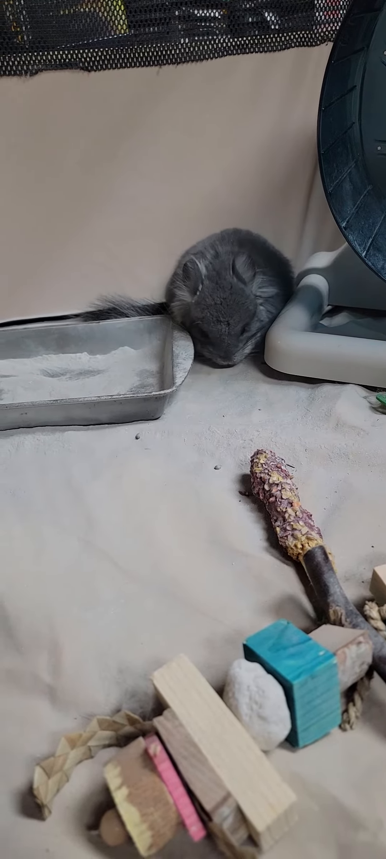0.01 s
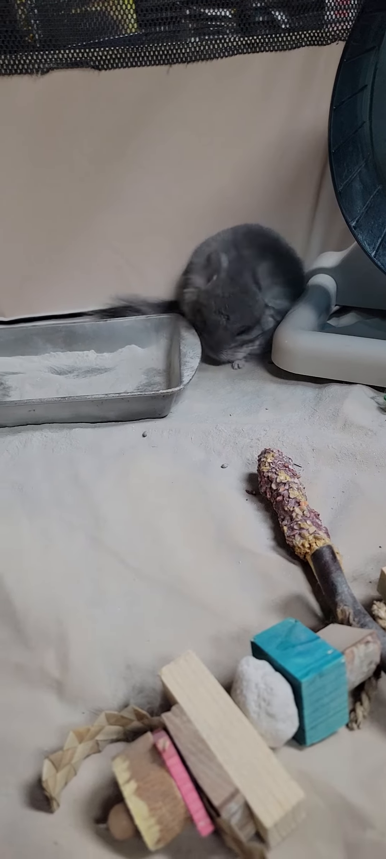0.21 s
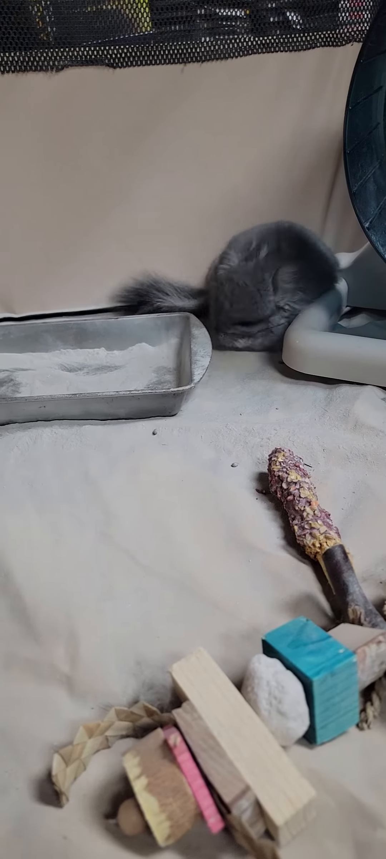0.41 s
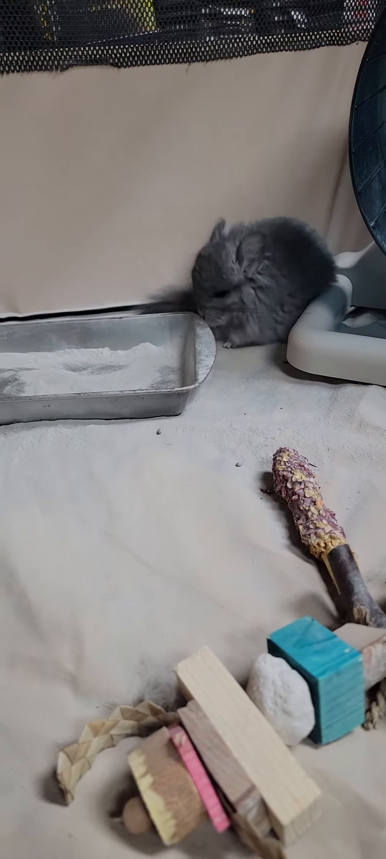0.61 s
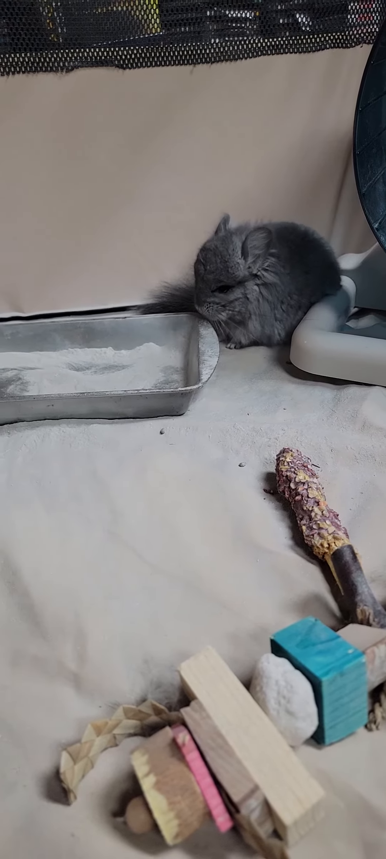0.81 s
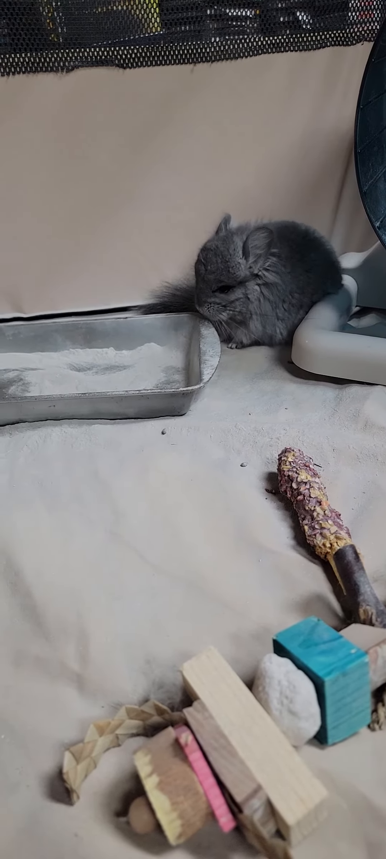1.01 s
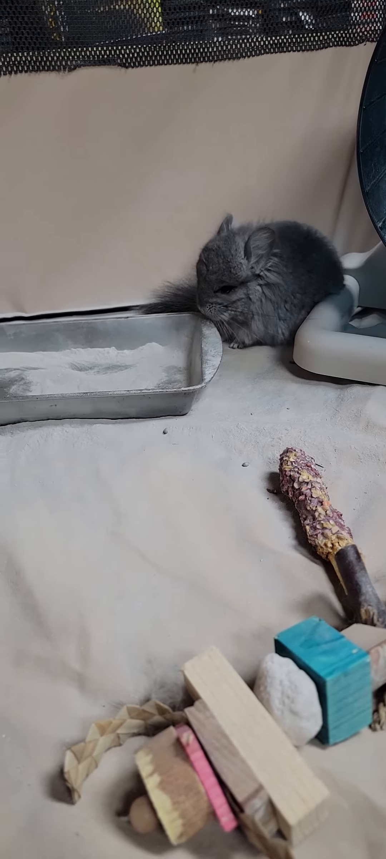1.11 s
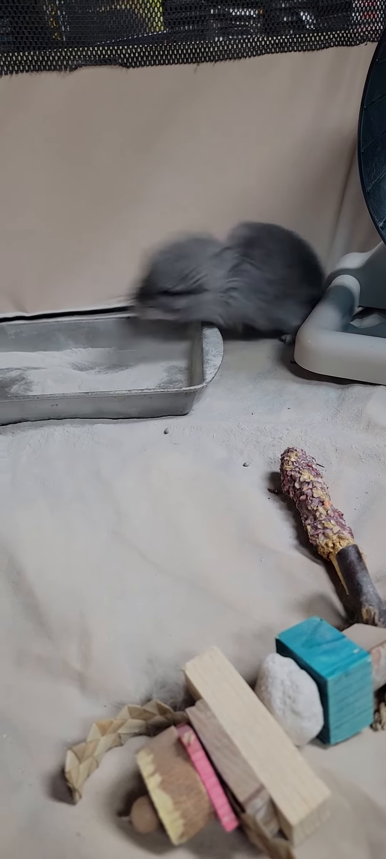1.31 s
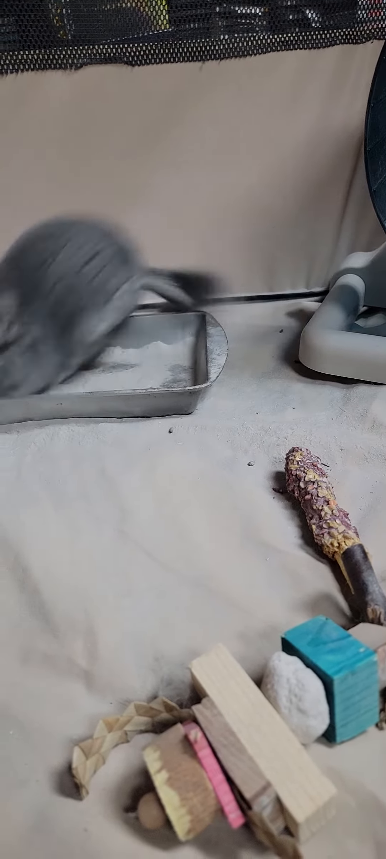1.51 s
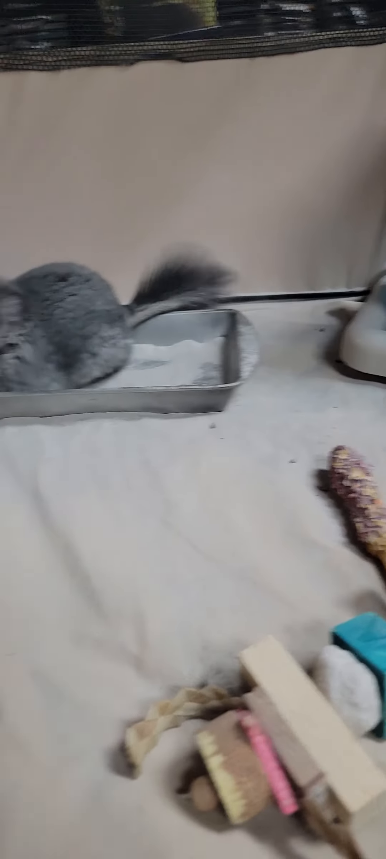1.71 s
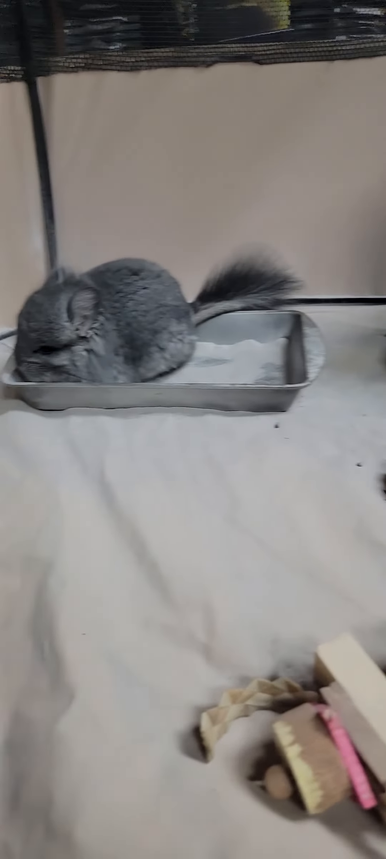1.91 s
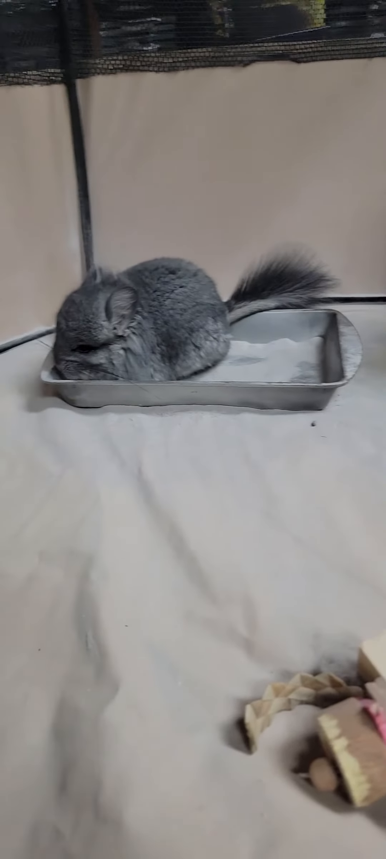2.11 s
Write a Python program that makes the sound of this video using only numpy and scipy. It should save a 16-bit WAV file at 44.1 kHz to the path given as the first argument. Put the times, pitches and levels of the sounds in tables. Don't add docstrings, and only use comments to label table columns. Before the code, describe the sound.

Small rodent's claws scratch taut cloth in a quick burst, then it lands in a metal tray

```python
import sys
import numpy as np
from scipy import signal
from scipy.fft import rfft, irfft
from scipy.io import wavfile
from scipy.ndimage import uniform_filter1d

SR = 44100
rng = np.random.default_rng(int(sys.argv[2]) if len(sys.argv) > 2 else 0)


def bounce(signal):
    frames = np.transpose(np.atleast_2d(signal))
    limited = np.clip(frames, -1, 1)
    pcm = np.round(limited * 32767).astype(np.int16)
    wavfile.write(sys.argv[1], SR, pcm)


def invert_db(x):
    u = np.asarray(x, float) / 20
    return 10 ** u


N = 97020
SLIPS_PER_S, GRAINS_PER_S = 5000, 16000
SPAN_DB = 25.5


def scratching():
    # peak_s, rise_s, fall_s, level_db, hiss_db
    strokes = [(.149, 0.0048, 0.043, -60.5, -24), (.186, 0.017, 0.079, -53, -4.5),
               (.242, 0.037, 0.032, -36.5, 1), (.253, 0.012, 0.011, -46, -2),
               (.296, 0.0047, 0.031, -48.5, -7), (.335, 0.037, 0.036, -39.5, -9.5),
               (.353, 0.026, 0.046, -41, -1.5), (.424, 0.011, 0.018, -43.5, -8),
               (.445, 0.13, 0.08, -51.5, 0.5), (.485, 0.049, 0.027, -51, -1.5),
               (.527, 0.021, 0.026, -51, 1), (.59, 0.0058, 0.0067, -54.5, -20),
               (.612, 0.016, 0.017, -61, -3), (.632, 0.011, 0.0068, -59.5, 8.5),
               (.66, 0.02, 0.03, -64.5, -1), (.676, 0.0094, 0.018, -57, -13)]
    # peak_s, rise_s, fall_s, level_db, hiss_db
    cracks = [
        (1.396, 0.0007, 0.015, -41, 2.5),
        (1.399, 0.0031, 0.042, -45.5, -13),
    ]
    drive = slips(SLIPS_PER_S, spread_db=1.0, clump_db=1.0)
    return rubbing([*strokes, *cracks], cloth, drive, fold_db=3.5)


def snagging():
    # start_s, level_db, pitch_khz
    catches = [(.2285, -31.5, 2.7), (.2345, -39.5, 1.28), (.2395, -34, 2.6), (.243, -28, 2.4),
               (.2478, -31, 3.4), (.2513, -28, 2.56), (.2538, -28.5, 2.3), (.2955, -43, 2.1),
               (.327, -34, 2.3), (.332, -37, 1.96), (.338, -33, 2.1), (.3465, -33.5, 1.93),
               (.3505, -33, 2.98), (.3555, -42, 2.8), (.372, -43, 1.94), (.399, -43, 2.3),
               (.4235, -35, 2.4), (.4345, -48, 5.5), (.461, -44, 2.9), (.482, -53, 1.77), (.526, -59, 2.6),
               (.590, -47.5, 1.9), (.631, -51.5, 2.24), (.675, -48, 2.3), (.721, -52, 0.63),
               (.743, -67, 2.4), (.785, -61, 2.4), (1.2352, -47.5, 1.25), (1.236, -58, 2.24),
               (1.251, -50.5, 1.15), (1.309, -63, 1.3), (1.321, -60, 1.4), (1.361, -56, 1.1),
               (1.3835, -51, 1.25), (1.5065, -33, 3.6), (1.549, -40, 4.6), (1.558, -32, 2.5),
               (1.572, -32, 2.67)]
    # mode_hz (at pitch 1), level_db, t60_s
    weave_modes = [(1037, -2.5, 0.016), (1317, -8.5, 0.011), (822, -11, 0.0033)]
    return blows(catches, weave_modes, soft_s=0.00027)


def rim_ticks():
    # start_s, level_db
    ticks = [
        (1.3962, -25.5),
        (1.4195, -53.5),
    ]
    # mode_hz, level_db, t60_s
    rim_modes = [(886, -9.5, 0.02), (1864, -1, 0.024), (1970, -10, 0.02), (2140, -7.5, 0.037),
                 (2565, 3, 0.026), (2880, -7, 0.04), (2950, -9, 0.035), (3340, -1.5, 0.028),
                 (3750, -9.5, 0.055), (4200, -35, 0.024), (7100, -11, .025)]
    return blows(ticks, rim_modes, soft_s=0.00016)


def paw_blows():
    # start_s, level_db, pitch_factor
    thumps = [
        (1.510, -47, 1.14),
        (1.5145, -26.5, 1.027),
        (1.5275, -31.5, 0.763),
        (1.8, -69, 0.5),
    ]
    # start_s, level_db, pitch_factor
    taps = [(.316, -42, 0.698), (.345, -50.5, 0.21), (.356, -43.5, 0.84), (.424, -42, 1.11),
            (.677, -50, 0.91), (.678, -51.5, 0.304), (1.248, -63, .6), (.51, -49, 0.645), (1.397, -40, 1.1),
            (1.32, -57, 1.56), (2.185, -54.5, 0.59)]
    # mode_hz, level_db, t60_s
    tray_modes = [(304, -12.5, 0.069), (563, -13.5, 0.081), (749, -8.5, 0.11), (802, -1.5, 0.036),
                  (956, 4, 0.022), (1108, -8.5, 0.081), (1840, -7.5, 0.013), (4000, -39, 0.014)]
    return blows(thumps, tray_modes, soft_s=0.0016) + blows(taps, tray_modes, soft_s=0.0015)


def first_contacts():
    # start_s, level_db, pitch_factor
    knocks = [
        (1.396, -33, 1.87),
        (1.5077, -28.5, 1.017),
        (1.5285, -43, 0.45),
    ]
    # mode_hz, level_db, t60_s
    knock_modes = [(811, 0, 0.036), (920, 9.5, 0.011)]
    return blows(knocks, knock_modes, soft_s=0.00041)[0]


def skidding():
    # peak_s, rise_s, fall_s, level_db, hiss_db
    skids = [
        (1.508, 0.0064, 0.062, -41, -3),
        (1.555, 0.035, 0.027, -42.5, 6.5),
        (1.574, 0.0057, 0.015, -47, 8.5),
        (1.592, 0.1, 0.028, -40, -1),
    ]
    drive = slips(GRAINS_PER_S, spread_db=1.8, clump_db=-1.0)
    return rubbing(skids, dust, drive, fold_db=2.5)


def shuffling():
    # peak_s, rise_s, fall_s, level_db
    shuffles = [(0.044, 0.013, 0.036, -63.5), (.56, 0.55, 0.3, -63.5), (.705, 0.11, 0.069, -59),
                (0.745, 0.014, 0.061, -59.5), (0.784, 0.0092, 0.15, -60.5), (0.862, 0.0077, .05, -68.5),
                (1.24, 0.029, 0.028, -63), (1.255, .02, 0.017, -64), (1.289, 0.096, 0.074, -67.5),
                (1.318, 0.039, 0.093, -62), (1.36, 0.0088, 0.14, -61), (1.644, 0.04, 0.013, -63.5),
                (1.689, 0.0082, 0.017, -66.5), (2.2, 0.084, .05, -67.5)]
    # freq_hz, level_db (per Hz)
    fur_colour = [(250, -61), (500, 3.5), (1300, -4), (2300, -5.5), (4800, -7.5), (7500, -12.5),
                  (9800, -28), (14000, -13)]
    fur = evened(coloured(slips(SLIPS_PER_S, spread_db=2.5, clump_db=1.75), fur_colour))
    return fur * sum(swell(*row) for row in shuffles)


def pressing():
    # peak_s, rise_s, fall_s, level_db
    presses = [(.2, 0.042, .05, -69.5), (.32, 0.043, 0.04, -58), (.44, 0.09, .08, -60.5),
               (.52, 0.063, 0.15, -62.5), (.59, .02, 0.043, -62.5), (.68, 0.036, 0.11, -63.5),
               (1.25, 0.057, 0.065, -62.5), (1.64, 0.055, 0.11, -63)]
    # freq_hz, level_db (per Hz)
    padding_colour = [(70, -30), (130, -1), (300, -3.5), (650, -7), (1300, -37)]
    padding = evened(coloured(slips(SLIPS_PER_S, spread_db=2.5, clump_db=3.0), padding_colour))
    return padding * sum(swell(*row) for row in presses)


def rubbing(rows, body, drive, fold_db):
    # freq_hz, level_db (per Hz)
    hiss_colour = [(1760, -47.5), (3000, -1), (5220, -9.5), (7100, -10), (7890, -13.5), (11600, -19),
                   (12500, -11), (16000, -9)]
    fibres = evened(drive) + 0.8 * evened(slips(GRAINS_PER_S, spread_db=1.5, clump_db=1.0))
    low = evened(folds(body(drive), fold_db))
    high = evened(folds(coloured(fibres, hiss_colour), fold_db))
    return sum(swell(peak, rise, fall, db) * (low + invert_db(hiss_db) * high)
               for peak, rise, fall, db, hiss_db in rows)


def slips(per_s, spread_db, clump_db):
    size = invert_db(spread_db * np.minimum(rng.exponential(1, (2, N)), 4))
    happens = rng.random((2, N)) < per_s / SR
    sign = rng.choice([-1., 1.], (2, N))
    clump = evened(uniform_filter1d(rng.standard_normal(N), size=130))
    return size * happens * sign * invert_db(clump_db * clump)


def cloth(x):
    # freq_hz, width_hz, level_db
    resonances = [(580, 260, -11.5), (1250, 360, -6.5), (1797, 88, 1), (2243, 173, 0.5), (2573, 220, 0.5),
                  (2770, 240, 1), (3380, 570, -7), (4190, 870, -6.5)]
    hz = np.fft.rfftfreq(N, 1 / SR)
    shape = 0
    for k, (f, width, db) in enumerate(resonances):
        shape = shape + invert_db(db) / (1 + 1j * (hz - f) / (width / 2)) * (-1) ** k
    low_cut = hz ** 2 / (hz ** 2 + 450. ** 2)
    return irfft(rfft(x) * shape * low_cut, N)


def dust(x):
    # freq_hz, level_db (per Hz)
    dust_colour = [(150, -9), (350, -11), (700, 15.5), (1400, 7.5), (2600, 4.5), (3600, -15), (5000, -4.5),
                   (8000, -28)]
    return coloured(x, dust_colour)


def folds(x, fold_db):
    z = signal.stft(x, nperseg=256)[2]
    patch = uniform_filter1d(rng.standard_normal(z.shape[1:]), size=3, axis=0)
    patch = evened(uniform_filter1d(patch, size=7, axis=1))
    return signal.istft(z * invert_db(fold_db * patch), nperseg=256)[1][:, :N]


def blows(rows, modes, soft_s):
    t, out = np.arange(4000) / SR, np.zeros((2, N + 4000))
    hz, db, t60 = np.transpose(modes)[:, :, None]
    turns = np.round(rng.random((len(rows), 2, len(modes), 1))) * [[[0]], [[.5]]]
    for (start, level_db, *pitch), turn in zip(rows, turns):
        f = hz * (pitch[0] if pitch else 1)
        partials = invert_db(db - 60 * t / t60) * np.sin(2 * np.pi * (f * t + turn))
        ring = partials.sum(1) * (1 - np.exp(-t / soft_s))
        out[:, round(start * SR):][:, :len(t)] += invert_db(level_db) * ring / abs(ring[0]).max()
    return out[:, :N]


def swell(peak, rise, fall, db):
    t = np.arange(N) / SR - peak
    return invert_db(db - SPAN_DB * np.where(t < 0, (abs(t) / rise) ** 1.65, abs(t) / fall))


def evened(x):
    return x / np.sqrt(np.mean(x ** 2) + 1e-20)


def read(points, hz):
    f, value = np.transpose(points)
    return np.interp(np.log(hz + 1), np.log(f + 1), value)


def coloured(x, points):
    return irfft(rfft(x) * invert_db(read(points, np.fft.rfftfreq(N, 1 / SR))), N)


def pen(x):
    t = np.arange(SR // 2) / SR
    taps = rng.standard_normal((4, len(t))) * (t > .002)
    near = taps[:2] * invert_db(-60 * t / .06)
    far = taps[2:] * invert_db(-60 * t / .3)
    near, far = (v / np.linalg.norm(v, axis=1)[:, None] for v in (near, far))
    return x + signal.fftconvolve(x, invert_db(-10) * near + invert_db(-24) * far, axes=1)[:, :N]


def ports(pair, same):
    # freq_hz, right_lead_rad
    port_turn = [(60, -.28), (200, -.35), (350, -1.0), (520, -1.9), (860, -2.8), (1100, -2.5), (1900, -.8),
                 (4100, -2.8), (5600, -3.5), (9400, -5.0), (14800, -9.2)]
    # freq_hz, left_over_right_db
    port_tilt = [(60, -2), (350, -7.5), (520, 2), (860, 1.5), (1700, 3.5), (3500, -3), (6000, 2.5),
                 (13000, -0.5)]
    hz, (a, b) = np.fft.rfftfreq(N, 1 / SR), rfft(pair)
    likeness = np.clip(read(same, hz), 0, 1)
    tilt = invert_db(read(port_tilt, hz) / 2)
    right = likeness * a + np.sqrt(1 - likeness ** 2) * b
    right = right * np.exp(1j * read(port_turn, hz))
    return irfft(np.array([a * tilt, right / tilt]), N)


def booms():
    # peak_s, rise_s, fall_s, level_db, pitch_hz
    boards = [(0.0558, 0.57, 0.2, -46.5, 38.96), (.558, 0.065, 0.061, -25.5, 47),
              (0.611, 0.023, 0.031, -35, 57), (0.676, 0.06, 0.033, -39, 47.5), (.668, .04, .04, -47, 72.6),
              (0.798, 0.13, 0.047, -52.5, 38.8), (1.068, 0.1, 0.027, -50, 58),
              (1.158, 0.22, 0.1, -45.5, 51.9), (0.53, 0.023, 0.032, -52.5, 100),
              (.64, 0.016, 0.083, -48.5, 104), (.56, 0.045, 0.15, -42, 26), (0.24, 0.048, 0.19, -59, 73.5),
              (2.099, 0.019, 0.049, -55, 101), (1.663, 0.083, 0.07, -44, 42.3),
              (1.698, 0.039, 0.057, -49, 95.5), (1.1, 0.022, 0.076, -50, 49)]
    t = np.arange(N) / SR
    out = np.zeros(N)
    for peak, rise, fall, db, hz in boards:
        envelope = uniform_filter1d(swell(peak, rise, fall, db), size=300)
        out += envelope * np.sqrt(2) * np.cos(2 * np.pi * hz * (t - peak))
    return out


def room_tone():
    # freq_hz, level_db (per Hz)
    rumble_colour = [(11, -53), (18, 0), (59, 0), (90, -1), (124, -10), (265, -22), (324, -18.5),
                     (384, -34), (1000, -30), (1300, -51), (2200, -120)]
    # freq_hz, level_db (per Hz)
    faint_hiss_colour = [(470, -8), (800, -9.5), (1550, -5.5), (2180, -15), (4130, -17), (5110, -24.5),
                         (6740, -22), (8550, -36), (16000, -27)]
    noise = rng.standard_normal((4, N))
    lumps = uniform_filter1d(rng.standard_normal(N), size=4000)
    lumps_db = evened(uniform_filter1d(lumps, size=4000))
    rumble = invert_db(-56 + lumps_db) * evened(coloured(noise[:2], rumble_colour))
    return rumble + invert_db(-72) * evened(coloured(noise[2:], faint_hiss_colour))


def scene():
    # freq_hz, likeness (0 to 1)
    near_same = [(100, .98), (350, .88), (860, .9), (1400, .6), (2400, .8), (4200, .5), (9000, .5),
                 (15000, .5)]
    # freq_hz, likeness (0 to 1)
    air_same = [(60, 1), (170, 0.99), (350, 0.49), (520, 0.21), (1000, 0.83), (1400, 0.06), (3000, 0.092)]
    animal = scratching() + snagging() + shuffling() + pressing()
    animal = animal + rim_ticks() + paw_blows() + skidding()
    background = room_tone() + booms() * np.array([[1], [0]])
    return first_contacts() + ports(pen(animal), near_same) + ports(background, air_same)


def band_limit(x):
    return signal.sosfilt(signal.butter(12, 15960, fs=SR, output="sos"), x)


def record(dry):
    below_edge = np.fft.rfftfreq(N, 1 / SR) < 15930
    return band_limit(irfft(rfft(dry) * below_edge, N))


dry = scene()
out = record(dry)
bounce(out)
```